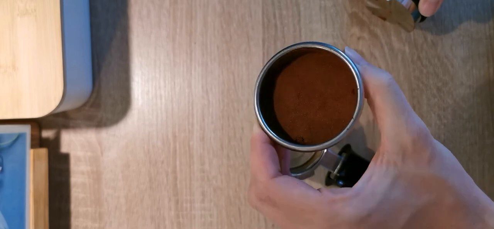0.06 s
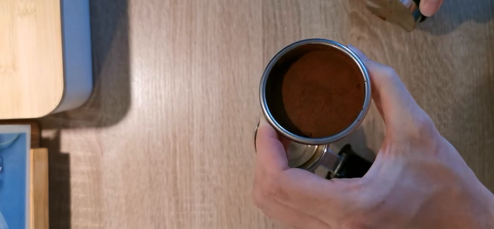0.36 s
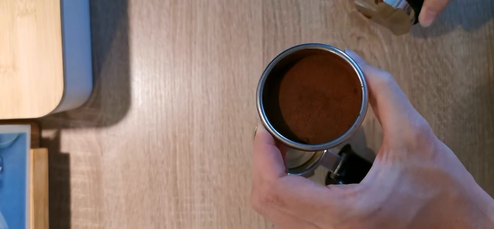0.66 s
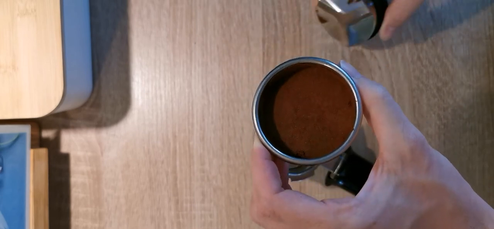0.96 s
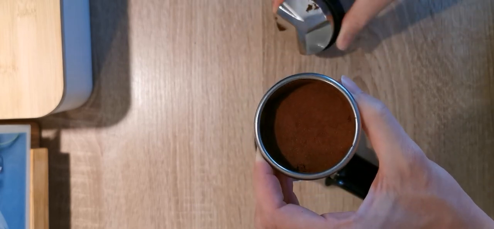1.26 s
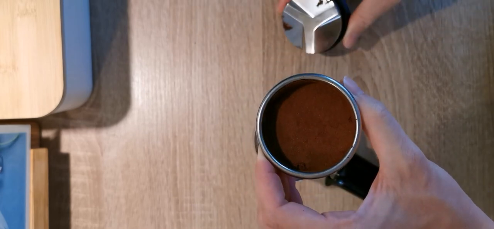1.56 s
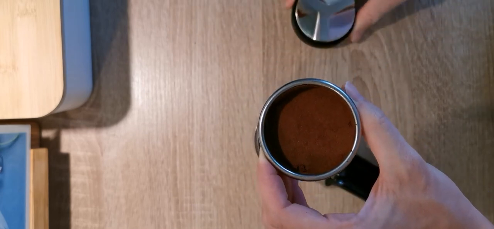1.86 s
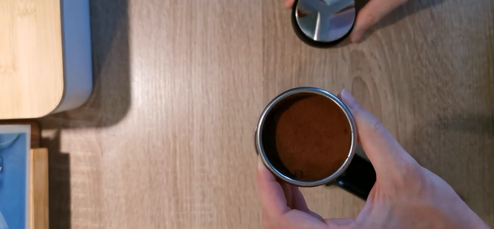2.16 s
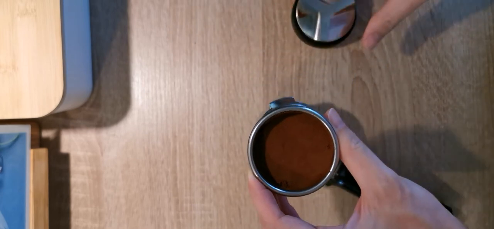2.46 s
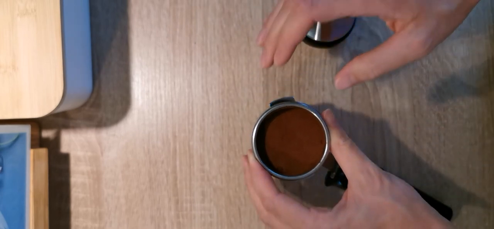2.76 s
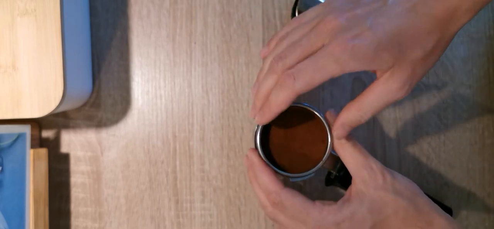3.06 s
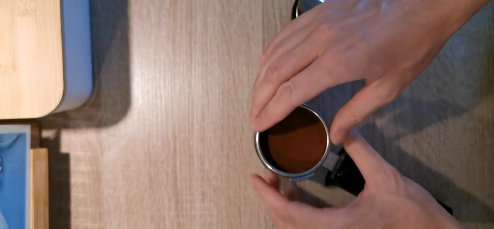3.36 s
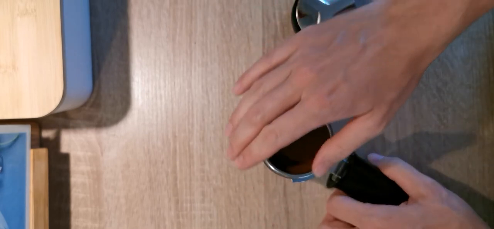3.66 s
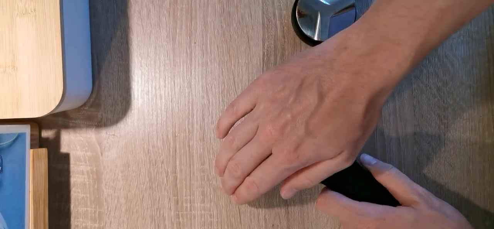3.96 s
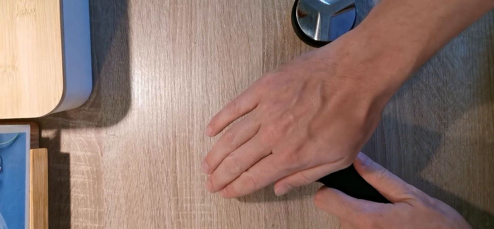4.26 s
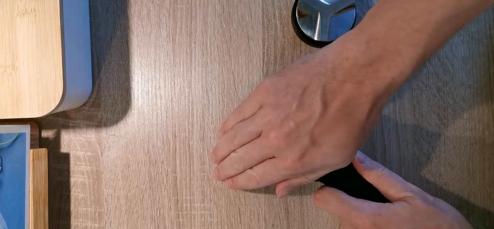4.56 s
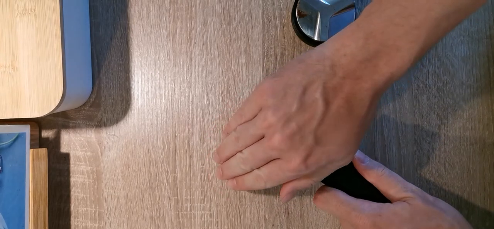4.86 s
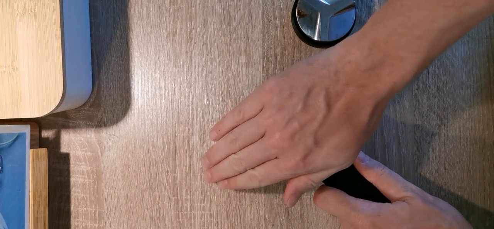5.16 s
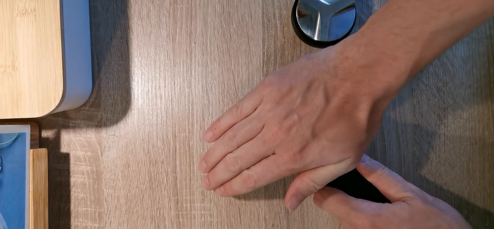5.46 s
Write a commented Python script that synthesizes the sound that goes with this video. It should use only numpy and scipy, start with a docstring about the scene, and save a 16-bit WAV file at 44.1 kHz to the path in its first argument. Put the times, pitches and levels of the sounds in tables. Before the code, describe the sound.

Two dull thuds, steel clinks on wood, soft hand bumps and a final sharp metal snap as a portafilter is handled in a quiet room.

```python
"""Portafilter on a wooden desk

In a small room a heavy coffee tool is put down with two thuds and a steel portafilter clinks onto the
wood. A palm bumps and presses on the filled basket until it snaps into its seat. Each impact excites
the damped modes of wood or steel; rubbing skin and squeezed air are shaped noise.
Faint room air, mains hum and a pulsing whine lie underneath."""
import sys
import numpy as np
from scipy import signal
from scipy.fft import rfft, irfft, next_fast_len
from scipy.io import wavfile

SR = 44100
rng = np.random.default_rng(int(sys.argv[2]) if len(sys.argv) > 2 else 0)


def unload_wav(signal):
    """Save mono or channel-first audio to the path in sys.argv[1] as 16-bit WAV at rate SR, clipped to [-1, 1]."""
    wavfile.write(
        sys.argv[1],
        SR,
        np.round(np.clip(np.atleast_2d(signal).T, -1, 1) * 32767).astype(np.int16),
    )


N = 242550
TIME = np.arange(N) / SR
RING_TIME = np.arange(int(0.6 * SR)) / SR
BANDS_HZ = 25 * 2 ** (np.arange(29) / 3)
PORT_LAG_S = 0.000821   # delay at the right microphone port

# The portafilter is pushed against the desk. Each row: start in seconds, knock in dB, contact cut-off
# in Hz, thump in dB, thump pitch in Hz, pitch favoured by the struck spot in Hz.
DESK_KNOCKS = [(2.9138, -45.5, 895, -58, 128, 327), (3.2556, -43, 1160, -33.5, 128.6, 265),
               (3.732, -45, 850, -61, 124, 930), (3.746, -40, 705, -52, 127, 265),
               (5.261, -43.5, 590, -29, 121.5, 294), (5.282, -41, 1460, -32.5, 107.5, 447)]
# Steel meets wood and steel. Each row: start in seconds, level in dB, contact cut-off in Hz,
# ring in dB, pitch favoured by the struck spot in Hz, its boost in dB.
STEEL_CLINKS = [(0.508, -78, 2500, -87, 2180, 11), (0.817, -74.5, 2460, -86, 2200, 9.5),
                (2.9122, -36, 4260, -38, 3420, 4.5), (2.994, -54, 4200, -58, 2560, 5.5),
                (3.008, -54.5, 6200, -57.5, 835, 25.5), (3.126, -47.5, 6000, -45.5, 1214, 10),
                (3.255, -38, 13400, -36.5, 864, 19), (3.741, -57.5, 1990, -58.5, 1877, 18),
                (3.856, -81, 2000, -77, 1850, 19), (4.059, -67, 2780, -74, 2270, 14),
                (5.264, -49, 4500, -60, 2490, 11)]
# The basket slips. Each row: start in seconds, level in dB, contact cut-off in Hz, ring in dB.
BASKET_SNAPS = [(3.2552, -37, 14900, -72), (3.621, -62.5, 14900, -79), (4.21, -77, 15100, -91.5),
                (4.997, -69.5, 15300, -99), (5.267, -50, 13900, -81), (5.2814, -27.5, 12900, -47),
                (5.2834, -27, 10800, -71)]
# The tool's steel base meets the desk. Each row: start in seconds, its own note in dB, knock in dB,
# thump in dB, pitch favoured by the struck spot in Hz.
TOOL_LANDINGS = [(1.474, -48.5, -36, -21.5, 215), (1.822, -51.5, -54.5, -58, 3250),
                 (1.836, -46.5, -46.5, -52, 3100), (1.843, -39.5, -40.5, -45.5, 615)]
# Soft blows of the hand. Each row: start in seconds, knock in dB, thump in dB, thump pitch in Hz.
HAND_BUMPS = [(3.628, -62, -37.5, 104), (3.720, -43.5, -41, 116), (3.934, -42.5, -39.5, 122.4),
              (4.057, -51.5, -43, 137.2), (4.775, -51.5, -35.5, 108.3), (4.997, -55, -58, 130),
              (5.246, -46, -43, 134), (5.421, -49, -35, 101)]
# The grip settles. Each row: start in seconds, length in seconds, first nudge in dB.
GRIP_SETTLES = [(3.79, 0.08, -57), (3.985, 0.23, -47)]
# Skin slides on steel. Each row: start in seconds, length in seconds, level in dB.
SKIN_RUBS = [(3.615, 0.39, -57.5), (4.994, 0.27, -63)]
# Air escapes from under the palm. Each row: time of the peak in seconds, level in dB.
AIR_PUFFS = [(4.813, -39), (4.966, -56.5)]

# Clear modes of each object. Each row: frequency in Hz, level in dB, time to fall 60 dB in seconds.
WOOD_MODES = [(64, -6.5, 0.55), (116.3, -6.5, 0.26), (196.1, 2, 0.2), (277.8, 0, 0.26), (346, -7, 0.57),
              (433.5, 6.5, 0.066), (582, -2.5, 0.35)]
HEAD_MODES = [(792, -10, 0.14), (1093, -11, 0.38), (1214, -16, 0.31), (1695, -3.5, 0.056), (1848, 6, 0.054),
              (1980, -3, 0.11), (2220, -19, 0.19), (2567, 4, 0.21), (2609, 5, 0.092), (3310, 2.5, 0.095),
              (5230, -16, .25), (5730, -11, 0.29), (6100, -0.5, 0.18), (6660, -4, 0.14), (9000, -24, 0.17),
              (8200, -21.5, 0.36), (9851, -21.5, 0.31), (10450, -30, .18)]
THIN_BASKET_MODES = [(410, 11, 0.18), (636, -2, 0.25), (810, -8, 1), (966, -8, 0.21), (2464, 12, 0.075),
                     (3350, -10, .25), (4150, 0, 0.14), (5300, -9, 0.44), (7300, -15, .3), (7080, 9, 0.4),
                     (8400, -4, 0.28), (9060, -20, 0.36), (9600, -12, 0.11), (10500, -8, 0.12)]
HEAVY_TOOL_MODES = [(582, -2.5, 0.19), (1165, -21.5, 0.3), (1680, -26, 0.098), (2420, -20.5, 0.18),
                    (3000, -11.5, 0.091), (3210, -6.5, 0.045), (3910, -15, 0.079)]
# Crowds of short-lived modes. Each row: frequency in Hz, level in dB per third octave.
WOOD_SPECTRUM = [(25, -35), (80, -23), (140, -9), (250, -3), (450, -8), (900, -9), (1800, -13),
                 (3200, -7.5), (6000, -8.5), (16000, -7)]
HEAD_SPECTRUM = [(60, -52), (200, -15.5), (450, -14), (700, -8), (900, -12.5), (1300, -15.5), (1650, -5.5),
                 (3000, -2), (4400, -13), (6300, -3.5), (7800, -21), (10500, -9.5), (16000, -6)]
BASKET_SPECTRUM = [(60, -66), (250, -40), (550, -10), (1000, -8.5), (1500, -21), (2600, -18), (4000, -12),
                   (5500, -4.5), (8000, -2.5), (10000, -13), (12500, -14), (16000, -7)]
# Friction and airflow noise. Each row: frequency in Hz, level in dB per third octave.
RUB_SPECTRUM = [(25, -11.5), (120, -0.5), (260, -5.5), (600, -18.5), (1300, -19), (5000, -20), (11000, -30),
                (16000, -22)]
PUFF_SPECTRUM = [(25, 1), (40, 0.5), (70, -7.5), (120, -1.5), (200, -25), (600, -29.5), (2000, -40),
                 (16000, -80)]

# Reverberation of the room. Each row: frequency in Hz, time to fall 60 dB in seconds.
ROOM_DECAY = [(60, 0.92), (200, 0.44), (500, 0.42), (2000, 0.49), (6000, 0.46), (9000, 0.31), (12000, 0.13),
              (16000, 0.3)]
# Response of the two microphone ports. Each row: frequency in Hz, left gain in dB, right gain in dB.
PORT_RESPONSE = [(99, -9, -3.5), (237, -8.5, 0), (488, -2, -14), (980, -5.5, -3), (2510, -5, -5),
                 (5100, -8, -5.5), (6970, -8, 0), (8800, 3, -8.5), (10830, 17, -3), (12800, 6, -3),
                 (16000, 3, -14)]
# Likeness of the sound at the two ports. Each row: frequency in Hz, coherence from 0 to 1.
PORT_COHERENCE = [(100, 0.94), (250, 1), (500, 0), (900, 0), (1600, 0), (16000, 0.12)]
# Room air and microphone hiss. Each row: frequency in Hz, left and right level in dB per third octave.
AIR_SPECTRUM = [(26, -84.5, -80), (50, -83, -82.5), (94, -84.5, -75.5), (158, -85.5, -83),
                (220, -88, -79.5), (370, -84.5, -88), (1040, -87.5, -90), (1800, -88.5, -91),
                (4320, -86.5, -89.5), (6200, -92, -90), (8500, -96, -93.5), (10510, -75.5, -99.5),
                (12400, -80, -90), (15600, -86.5, -101)]
# Slow swell of that air and hiss. Each row: time in seconds, gain in dB.
AIR_SWELL = [(0, -0.5), (1, 0), (2.5, 3.5), (4, 4.5), (5.5, 2.5)]
# Mains hum. Each row: frequency in Hz, left level in dB, right level in dB.
HUM_PARTIALS = [(48.7, -70.5, -64), (97.4, -76.5, -73.5)]


def desk_knocks(bank, desk):
    """Impact excitation: the portafilter's firm blows sound the desk's modes and flex its top."""
    out = np.zeros((2, N))
    for start, knock_db, contact_hz, thump_db, thump_hz, spot_hz in DESK_KNOCKS:
        add(out, start, knock(bank, desk, knock_db, contact_hz, spot_hz) + thump(thump_db, thump_hz))
    return out


def tool_rocks(bank, desk, touches=4, gap_s=0.0185, loss_db=3.5, contact_hz=1215, dulling=0.61):
    """Dissipative rocking: the tool lands with a hollow note, then each touch is weaker and duller."""
    out = np.zeros((2, N))
    note = sum(from_db(mode_db) * ring(hz, t60) for hz, mode_db, t60 in HEAVY_TOOL_MODES)
    for start, note_db, knock_db, thump_db, spot_hz in TOOL_LANDINGS:
        add(out, start, from_db(note_db) * note + thump(thump_db, hz=126.6))
        for k in range(touches):
            touch = knock(bank, desk, knock_db - k * loss_db, contact_hz * dulling ** k, spot_hz)
            add(out, start + k * gap_s, touch)
    return out


def steel_clinks(bank):
    """Damped free vibration: the portafilter's head rings briefly in the hand that holds it."""
    out = np.zeros((2, N))
    head = body(HEAD_SPECTRUM, HEAD_MODES, t60=0.082, room_db=-10, build_s=0.0037, left_bias_db=9.5)
    for start, level_db, contact_hz, ring_db, spot_hz, boost_db in STEEL_CLINKS:
        clink = blow(bank, head, level_db, ring_db, contact_hz, resonance_db=2, q=61)
        clink = low_pass(clink, 2.04 * contact_hz, order=4)   # a steep low-pass dulls the highest treble
        add(out, start, struck_spot(clink, spot_hz, boost_db, q=30.5))
    return out


def basket_snaps(bank):
    """Elastic release: the thin basket ticks past its retaining spring and at last cracks home."""
    out = np.zeros((2, N))
    basket = body(BASKET_SPECTRUM, THIN_BASKET_MODES,
                  t60=0.059, room_db=-9, build_s=0.0039, left_bias_db=4.5)
    for start, level_db, contact_hz, ring_db in BASKET_SNAPS:
        add(out, start, blow(bank, basket, level_db, ring_db, contact_hz, resonance_db=-1, q=57))
    return out


def hand_bumps(bank, desk, contact_hz=396, spot_hz=248.7, gap_s=0.05, fade_db_per_s=34):
    """Cushioned impact: bumps of the hand and uneven nudges of the grip pass mostly bass to the desk."""
    out = np.zeros((2, N))
    for start, knock_db, thump_db, thump_hz in HAND_BUMPS:
        add(out, start, knock(bank, desk, knock_db, contact_hz, spot_hz) + thump(thump_db, thump_hz))
    for start, length, first_db in GRIP_SETTLES:
        for age in np.arange(0, length, gap_s):
            late, detune = 0.203 * rng.uniform(-0.977, 1, 2)
            nudge = knock(bank, desk, first_db - fade_db_per_s * age, contact_hz, spot_hz * np.exp(detune))
            add(out, start + age + late * gap_s, nudge)
    return out


def palm(bank):
    """Friction and flow noise: skin slides over the rim, and the palm pushes out low puffs of air."""
    sliding = sum(from_db(db) * gesture(start, length, rise_db_per_s=500)
                  for start, length, db in SKIN_RUBS)
    airflow = sum(from_db(db) * gesture(peak, 0, rise_db_per_s=333) for peak, db in AIR_PUFFS)
    rub = sliding * coloured(bank, RUB_SPECTRUM)
    puff = airflow * coloured(bank, PUFF_SPECTRUM)
    return rub + low_pass(puff, hz=1500)


def gesture(start, length, rise_db_per_s, fall_db_per_s=145):
    """Exponential envelope: the gain rises until the start, holds, then falls away."""
    before = np.maximum(start - TIME, 0)
    after = np.maximum(TIME - start - length, 0)
    return from_db(-rise_db_per_s * before - fall_db_per_s * after)


def knock(bank, desk, level_db, contact_hz, spot_hz):
    """Impact response: the wooden top answers one blow, coloured by the spot struck."""
    wood = blow(bank, desk, level_db, level_db - 3.5, contact_hz, resonance_db=-9.5, q=15)
    return struck_spot(wood, spot_hz, boost_db=6.5, q=11.7)


def thump(level_db, hz, t60=0.36, rise_s=0.0036):
    """Flexural vibration: the top bends at a pitch that depends on where and how it is loaded."""
    return -from_db(level_db) * ring(hz, t60) * (1 - np.exp(-RING_TIME / rise_s))


def blow(bank, struck, level_db, ring_db, contact_hz, resonance_db, q):
    """Modal superposition: a contact excites dense and clear modes; its finite length cuts the treble."""
    envelopes, rings, pitches = struck
    offset = rng.integers(N - len(RING_TIME))
    noise = bank[:, :, offset:offset + len(RING_TIME)]
    dense = from_db(level_db) * np.sum(envelopes * noise, axis=0)
    # the reflections carry the object's resonances too
    resonant = sum(resonance(dense, hz, q) for hz in pitches)
    scatter_db = 1.8 * rng.standard_normal((len(rings), 2, 1))
    clear = np.sum(from_db(ring_db + scatter_db) * rings, axis=0)
    return low_pass(dense + from_db(resonance_db) * resonant + clear, contact_hz)


def struck_spot(x, hz, boost_db, q):
    """Selective excitation: the point of impact brings out the resonances near one pitch."""
    return x + (from_db(boost_db) - 1) * resonance(x, hz, q)


def body(spectrum, modes, t60, room_db, build_s, left_bias_db):
    """Impulse response: band envelopes of the dense modes and room, the clear modes, and their pitches."""
    balance = from_db([[left_bias_db / 2], [-left_bias_db / 2]])
    direct = balance * from_db(-60 * RING_TIME / t60)
    room_t60 = at_hz(ROOM_DECAY, BANDS_HZ)[:, None]
    build_up = 1 - np.exp(-RING_TIME / build_s)
    room = build_up * from_db(room_db - 60 * RING_TIME / room_t60)
    band_gains = from_db(at_hz(spectrum, BANDS_HZ))[:, None, None]
    envelopes = band_gains * np.hypot(direct, room[:, None])   # direct and reflected powers add
    rings = [(-1) ** k * from_db(db) * ring(hz, mode_t60) for k, (hz, db, mode_t60) in enumerate(modes)]
    return envelopes, np.array(rings), [mode[0] for mode in modes]


def ring(hz, t60):
    """Damped oscillation: one mode at both ports; short waves arrive a quarter cycle apart."""
    lag_s = PORT_LAG_S if hz < 700 else 1 / (4 * hz)
    age = np.maximum(RING_TIME - np.array([[0], [lag_s]]), 0)
    return np.sin(2 * np.pi * hz * age) * from_db(-60 * age / t60)


def noise_bank():
    """Partial coherence: third-octave noises (band, port, time), alike at both ports in the bass only."""
    white = rng.standard_normal((2, 2, N + SR))
    bank = []
    for k, hz in enumerate(BANDS_HZ):
        edges_hz = hz * 2 ** (np.array([-1, 1]) / 6)
        band_pass = signal.butter(2, edges_hz, "band", fs=SR, output="sos")
        pair = signal.sosfilt(band_pass, white[k % 2])[:, SR:]
        mid, side = pair / pair.std()
        alike = at_hz(PORT_COHERENCE, hz)
        left, right = np.sqrt((1 + alike) / 2) * mid + np.sqrt((1 - alike) / 2) * side * [[1], [-1]]
        bank.append([left, np.roll(right, round(PORT_LAG_S * SR))])
    return np.array(bank, dtype=np.float32)


def coloured(bank, spectrum, column=1):
    """Spectral shaping: the noise bands are summed, each at its own level."""
    return np.tensordot(from_db(at_hz(spectrum, BANDS_HZ, column)).astype(np.float32), bank, 1)


def through_ports(x):
    """Frequency response: each microphone port colours the sound with its own treble resonance."""
    size = next_fast_len(N + SR)
    hz = np.arange(size // 2 + 1) * SR / size
    gains = from_db([at_hz(PORT_RESPONSE, hz, column) for column in (1, 2)])
    return irfft(rfft(x, size) * gains, size)[:, :N]


def resonance(x, hz, q):
    """Resonance passes a band of width hz / q."""
    return signal.lfilter(*signal.iirpeak(hz, q, fs=SR), x)


def low_pass(x, hz, order=2):
    """Low-pass filtering weakens the treble above the cut-off."""
    return signal.sosfilt(signal.butter(order, min(hz, SR / 2 - 2000), fs=SR, output="sos"), x)


def from_db(db):
    """Amplitude grows tenfold every 20 dB."""
    return 10 ** (np.asarray(db) / 20)


def at_hz(points, hz, column=1):
    """Interpolation of one column on a log-frequency axis."""
    table = np.array(points)
    return np.interp(np.log(np.maximum(hz, 1)), np.log(table[:, 0]), table[:, column])


def add(out, start_s, sound):
    """Superposition: a sound joins the mix at its start time."""
    start = round(start_s * SR)
    out[:, start:start + sound.shape[1]] += sound[:, :N - start]


def room_air(bank):
    """Broadband noise floor: room air and hiss swell slowly."""
    noise = bank[:, :, ::-1]   # reversed in time, so unrelated to the palm's noise
    air = np.array([coloured(noise[:, side], AIR_SPECTRUM, column=side + 1) for side in range(2)])
    return from_db(np.interp(TIME, *np.transpose(AIR_SWELL))) * air


def mains_hum():
    """Harmonic series: a steady fundamental and its octave, each at a random phase."""
    return sum(np.sqrt(2) * from_db([[left], [right]]) * np.sin(2 * np.pi * (hz * TIME + rng.random()))
               for hz, left, right in HUM_PARTIALS)


def whine(hz=9570, level_db=-76.5, pulses_per_s=30.5, duty=0.25):
    """Amplitude modulation: a faint electronic tone on the left switches on and off."""
    gate = low_pass(1.0 * (TIME * pulses_per_s % 1 < duty), hz=200)
    return from_db(level_db) * gate * np.sin(2 * np.pi * hz * TIME) * [[1], [0]]


def scene():
    """Superposition: the handling sounds, coloured by the ports, add to the quiet background."""
    bank = noise_bank()
    desk = body(WOOD_SPECTRUM, WOOD_MODES, t60=0.032, room_db=-4, build_s=0.0016, left_bias_db=10)
    handling = desk_knocks(bank, desk) + tool_rocks(bank, desk) + steel_clinks(bank) + basket_snaps(bank)
    handling += hand_bumps(bank, desk) + palm(bank)
    return through_ports(handling) + room_air(bank) + mains_hum() + whine()


def record(dry, cutoff_hz=16000):
    """Band limiting: a steep low-pass removes the highest treble."""
    return signal.sosfilt(signal.ellip(10, 0.2, 80, cutoff_hz, fs=SR, output="sos"), dry)


dry = scene()
out = record(dry)
unload_wav(out)
```